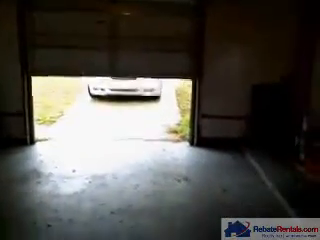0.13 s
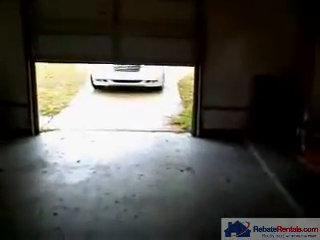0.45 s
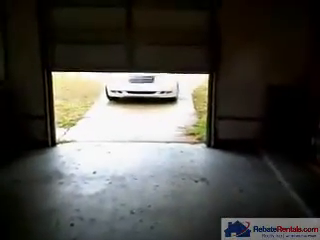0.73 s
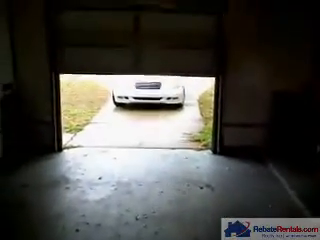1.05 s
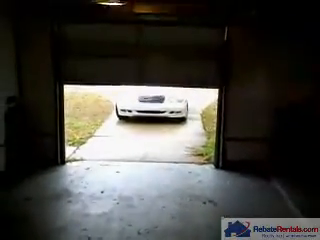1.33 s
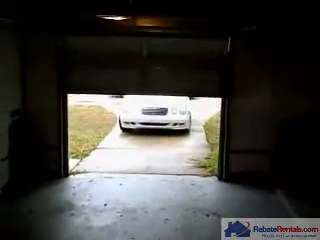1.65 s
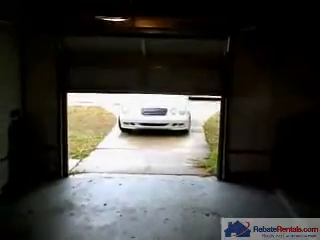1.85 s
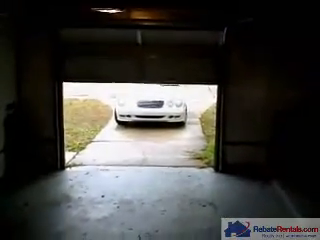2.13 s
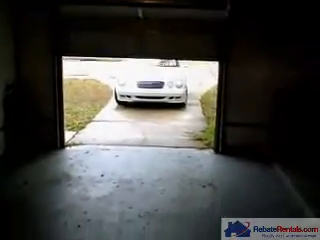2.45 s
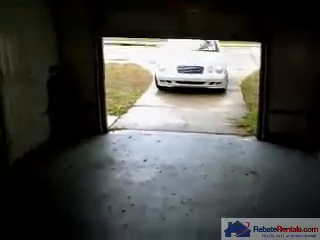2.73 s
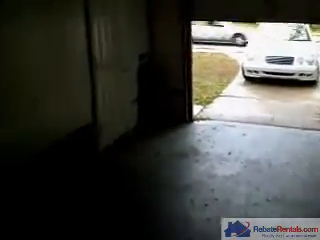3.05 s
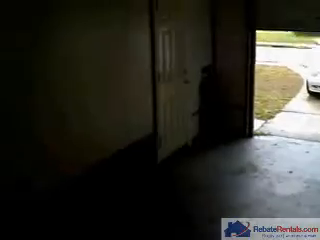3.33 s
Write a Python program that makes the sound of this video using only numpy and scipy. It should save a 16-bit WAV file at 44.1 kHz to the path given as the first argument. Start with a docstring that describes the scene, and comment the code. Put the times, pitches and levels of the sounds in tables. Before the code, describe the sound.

A garage door is already rising at 0 s and continues to the end, about 3.5 s. A low electric hum wavers under gear whirr, bright throbbing chain jingle and gritty roller scrape. Metallic clacks cluster before 0.3 s, scatter from 1.5 to 2 s, and snap sharply near 2.5 s. Panels then drum and rumble deeper. Mono, dull-topped sound, short bare-garage echo.

```python
"""An electric opener lifts a sectional garage door, heard in mono from inside the garage.
Its motor hums in harmonics while gear whirr, as shaped noise, excites resonances of the housing.
Filtered random impacts make the chain jingle and the rollers scrape; the panels sway, drum and rumble.
Hinges clack in noise bursts with a steel resonance, and the bare walls return a brief diffuse echo."""
import sys
import numpy as np
from scipy import signal
from scipy.fft import rfft, irfft, next_fast_len
from scipy.io import wavfile

SR = 44100
rng = np.random.default_rng(int(sys.argv[2]) if len(sys.argv) > 2 else 0)


def store_pcm(level_fs):
    """Save levels as 16-bit WAV."""
    pcm = np.round(np.clip(level_fs, -1, 1) * 32767).astype(np.int16)
    wavfile.write(sys.argv[1], SR, np.atleast_2d(pcm).T)


N = 154350  # 3.5 s
TOP_HZ = 8100  # upper limit of the recorded band


def undb(db):
    """Level definition: amplitude ratio = 10^(dB/20)."""
    return 10 ** (np.asarray(db) / 20)


def unit(x):
    """Normalisation: scale to an rms of 1."""
    return x / np.sqrt(np.mean(x ** 2))


def curve(rows, axis=1):
    """Envelope: interpolate one level column linearly in dB over time, then convert to gain."""
    rows = np.array(rows, float)
    level_db = np.interp(np.arange(N) / SR, rows[:, 0], rows[:, axis])
    return undb(level_db)


def walk(rate_hz):
    """Low-pass noise: a smooth random wander with an rms of 1."""
    f = np.arange(N // 2 + 1) * SR / N
    spectrum = rfft(rng.standard_normal(N)) / (1 + (f / rate_hz) ** 2) ** 2
    return unit(irfft(spectrum, N))


def ring(x, response):
    """Linear superposition: convolve a sound with an impulse response."""
    return signal.fftconvolve(x, response)[:len(x)]


def colour(x, points, size=8192):
    """Minimum-phase filtering: a causal filter through f/Hz, level/dB that keeps white-noise power."""
    hz, db = np.array(points, float).T
    f = np.arange(size // 2 + 1) * SR / size
    gain = undb(np.interp(np.log(f + 1), np.log(hz), db))
    gain = unit(gain / np.sqrt(1 + (f / TOP_HZ) ** 20))
    # Folding the cepstrum onto positive time gives the minimum phase
    cepstrum = irfft(np.log(gain))
    cepstrum[1:size // 2] *= 2
    cepstrum[size // 2 + 1:] = 0
    return ring(x, irfft(np.exp(rfft(cepstrum))))


def resonance(hz, width_hz):
    """Resonance: noise concentrated about one frequency, 6 dB down at width_hz to either side."""
    f = np.arange(N // 2 + 1) * SR / N
    response = 1 / (1 + ((f - hz) / width_hz) ** 2)
    return unit(irfft(rfft(rng.standard_normal(N)) * response, N))


def ticks(rate_per_s, spread_db):
    """Shot noise: random tiny impacts of uneven strength and either sign."""
    hit = rng.random(N) < rate_per_s / SR
    size = np.clip(rng.standard_normal(N), -2, 2)
    sign = np.sign(rng.standard_normal(N))
    return unit(hit * undb(spread_db * size) * sign)


HUM_HZ, HUM_WOBBLE, HUM_FLUTTER_DB = 119.5, 0.0038, 0.5  # twice the mains frequency; rms wobble, flutter
# Hum envelope: t/s, level/dB
HUM_ENVELOPE = [(0, -29), (.36, -27), (.44, -32), (.5, -29), (.6, -23.5), (.645, -34), (.69, -25),
                (.8, -28), (.855, -31), (.92, -25.5), (1.47, -24.5), (1.56, -29.5), (1.62, -24.5),
                (1.77, -31.5), (1.85, -22.5), (1.92, -30.5), (1.97, -24), (2.015, -39), (2.08, -27.5),
                (2.13, -49), (2.19, -25), (2.29, -33), (2.4, -26.5), (2.46, -35), (2.5, -30), (2.9, -28.5),
                (3.0, -37), (3.06, -29), (3.5, -30.5)]
# Harmonics of the hum: multiple, level/dB
HUM_HARMONICS = [(1, -0.5), (2, -16.5), (3, -27), (5, -29)]
# Relative spectrum of the motor and gear whirr: f/Hz, level per Hz/dB
WHIRR_SPECTRUM = [(20, -11), (45, -0.5), (80, -3), (105, 3.5), (135, 4), (160, -6), (190, 1), (230, -6.5),
                  (300, -6.5), (420, -11.5), (520, -10.5), (760, -10), (1050, -18.5), (2000, -19.5),
                  (4000, -23.5), (8000, -32)]
# Whirr envelope: t/s, level/dB
WHIRR_ENVELOPE = [(0, -34.5), (.3, -32), (.5, -35.5), (.9, -35), (1.3, -32), (1.7, -33), (2.15, -32),
                  (2.7, -33.5), (3.1, -35), (3.5, -33)]
# Resonances of the motor housing: f/Hz, width/Hz, level/dB
HOUSING_MODES = [(307, 3.3, -58.5), (498, 24, -56.5), (609, 59, -48), (1370, 140, -55.5)]


def motor():
    """Forced vibration: wavering mains harmonics, gear noise and resonances of the housing."""
    phase = 2 * np.pi * np.cumsum(HUM_HZ * (1 + HUM_WOBBLE * walk(14.4))) / SR
    hum = np.zeros(N)
    for multiple, db in HUM_HARMONICS:
        gain = undb(db + HUM_FLUTTER_DB * walk(15))
        hum += gain * np.sin(round(multiple) * phase + 2 * np.pi * rng.random())
    hum *= np.sqrt(2) * curve(HUM_ENVELOPE)  # root 2 turns peak into rms
    whirr_gain = curve(WHIRR_ENVELOPE)
    whirr = unit(colour(rng.standard_normal(N), WHIRR_SPECTRUM)) * whirr_gain
    housing = sum(undb(db) * resonance(hz, width) for hz, width, db in HOUSING_MODES)
    return hum + whirr + housing * unit(whirr_gain)


LINKS_PER_S, LINK_DEPTH_DB, CHAIN_TICKS_PER_S = 19, 2.4, 1000
RAIL_HZ, RAIL_WIDTH_HZ, RAIL_DB = 6160, 300, -44  # the rail sings under the sliding chain
# Relative spectrum of the chain jingle: f/Hz, level per Hz/dB
CHAIN_SPECTRUM = [(800, -33), (2500, -15.5), (4200, -8), (5000, -1.5), (5500, -1), (6050, 4), (6600, -2),
                  (7500, 0.5), (8200, -24.5)]
# Jingle envelope: t/s, level/dB
CHAIN_ENVELOPE = [(0, -35.5), (.45, -36.5), (.62, -36), (.8, -32), (.92, -38), (1.15, -36.5), (1.42, -40),
                  (1.55, -34), (1.67, -29), (1.9, -36.5), (2.05, -30.5), (2.15, -34.5), (2.33, -28.5),
                  (2.45, -32.5), (2.6, -34), (2.85, -33), (3.08, -40), (3.3, -34), (3.5, -35)]


def chain():
    """Amplitude modulation: links riding over the sprocket throb the bright ticks and the rail's ring."""
    phase = 2 * np.pi * np.cumsum(LINKS_PER_S * (1 + 0.054 * walk(4))) / SR
    throb = undb(LINK_DEPTH_DB * np.sin(phase) + 1.8 * walk(65))
    impacts = ticks(CHAIN_TICKS_PER_S, spread_db=0) * throb
    jingle = unit(colour(impacts, CHAIN_SPECTRUM)) * curve(CHAIN_ENVELOPE)
    rail = undb(RAIL_DB) * resonance(RAIL_HZ, RAIL_WIDTH_HZ) * throb
    return jingle + rail


SCRAPES_PER_S = 2500
# Relative spectrum of the rollers in their steel tracks: f/Hz, level per Hz/dB
ROLLER_SPECTRUM = [(150, 5), (400, 3.5), (700, 2), (1050, 0.5), (1700, 2.5), (2500, -0.5), (3300, 0.5),
                   (4500, -1.5), (6500, -1.5), (8200, -20)]
# Scrape envelope: t/s, level/dB
ROLLER_ENVELOPE = [(0, -36), (.055, -57), (.08, -33), (.28, -35), (.42, -42), (.58, -36.5), (.7, -38.5),
                   (1.05, -40), (1.43, -45), (1.48, -37), (1.58, -35), (1.67, -29), (1.73, -39),
                   (1.79, -31), (1.86, -40.5), (1.92, -37), (1.96, -32.5), (2.2, -33.5), (2.43, -35),
                   (2.7, -35), (2.98, -35), (3.15, -39), (3.23, -34.5), (3.32, -36), (3.4, -38), (3.5, -36)]


def rollers():
    """Friction as shot noise: gritty impacts that come and go as the rollers bear on the track."""
    scrape = unit(colour(ticks(SCRAPES_PER_S, spread_db=5.5), ROLLER_SPECTRUM))
    return scrape * curve(ROLLER_ENVELOPE)


SWAY_HZ, DRUM_HZ = 33.7, 58.6  # the two low modes of the door
RUMBLE_DB = -5  # relative to the combined gain of the two modes
# Envelopes of the two modes: t/s, sway level/dB, drumming level/dB
MODE_ENVELOPES = [(0, -45, -42), (.1, -40, -44), (.42, -34, -42), (.6, -45, -47), (.8, -35, -59),
                  (1.46, -45.5, -46), (1.5, -39, -35), (1.77, -52, -30), (1.82, -48, -51), (2.45, -34, -34),
                  (2.475, -35, -28), (2.78, -35, -22.5), (2.84, -28, -32.5), (2.9, -31.5, -28),
                  (3.08, -28, -31), (3.18, -27, -37), (3.42, -29, -45), (3.5, -27, -44)]
# Relative spectrum of the panel rumble: f/Hz, level per Hz/dB
RUMBLE_SPECTRUM = [(20, -11.5), (45, 0.5), (70, -8.5), (100, 1), (135, 0), (175, -1.5), (215, -12),
                   (290, -9), (400, -22.5), (900, -41.5)]


def panels():
    """Modal vibration: the door sways and drums in two wavering modes, and its rumble follows them."""
    def mode(hz, wobble, flutter_db):
        """Frequency and amplitude modulation: a low tone that wanders in pitch and level."""
        phase = 2 * np.pi * np.cumsum(hz * (1 + wobble * walk(9.2))) / SR
        return np.sqrt(2) * np.sin(phase) * undb(flutter_db * walk(15))

    sway_gain = curve(MODE_ENVELOPES, axis=1)
    drum_gain = curve(MODE_ENVELOPES, axis=2)
    sway = sway_gain * mode(SWAY_HZ, wobble=0.055, flutter_db=1.5)
    drum = drum_gain * mode(DRUM_HZ, wobble=0.019, flutter_db=2.0)
    noise = unit(colour(rng.standard_normal(N), RUMBLE_SPECTRUM))
    rumble = undb(RUMBLE_DB) * noise * np.hypot(sway_gain, drum_gain)
    return sway + drum + rumble


CONTACT_S, RING_S = 0.0012, .02  # time for the power of a contact and of the ring to fall to 1/e
CLACK_DB, RING_DB = 5.5, -17  # gain of the whole clack; ring relative to its contacts
PEAK_WIDTH_HZ, PEAK_DB = 280, -4.5  # the one resonance of a hinge that stands out
# Clacks of hinges and rollers, levels before CLACK_DB; a longer attack is a sliding contact:
# t/s, panel knock level/dB, steel ring level/dB, steel resonance f/Hz, attack/s
CLACK_EVENTS = [(.067, -26.5, -40, 6000, .008), (.094, -32, -24.5, 6100, 0.01),
                (.161, -31, -20.5, 6900, .008), (.183, -32, -27.5, 5600, .004),
                (0.2326, -27, -17.5, 5210, .001), (.247, -24.5, -31, 5330, .002),
                (.4998, -35.5, -38, 6000, 0.0035), (.5644, -35, -42, 6000, .006),
                (1.457, -32, -36, 6000, 0.0051), (1.5336, -30.5, -28.5, 6100, .006),
                (1.5981, -31, -27, 6200, .008), (1.7579, -31.5, -25.5, 6100, .006),
                (1.9368, -29, -33, 6000, 0.0042), (1.9784, -34, -23, 6000, .005),
                (2.183, -43, -30, 6100, .005), (2.4623, -25.5, -17.5, 6150, .0005),
                (2.477, -28, -24, 6200, .001), (2.6229, -25, -24.5, 6200, 0.006),
                (2.909, -30.5, -26, 6200, 0.0054), (3.1984, -35.5, -44, 6000, .008),
                (3.3435, -40, -41.5, 6000, .006), (3.3713, -28.5, -33, 6200, 0.0058)]
# Chatter after each clack: delay/s, level/dB
CHATTER = [(.003, 1.5), (.007, -3), (0.017, -4), (0.021, -7.5)]
# Relative spectrum of the panel knock: f/Hz, level per Hz/dB
KNOCK_SPECTRUM = [(60, 10), (200, 2), (350, 2), (650, 2), (1100, -0.5), (2000, 1), (3200, 5), (4500, 0.5),
                  (8000, -16)]
# Relative spectrum of the hinge steel: f/Hz, level per Hz/dB
STEEL_SPECTRUM = [(1500, -19.5), (3000, -11.5), (4100, -8), (4700, -0.5), (5600, 1.5), (6500, 3),
                  (7300, -1), (8200, -22)]


def hinges():
    """Impact excitation: each clack chatters, knocks the panel and rings the steel at its own pitch."""
    t = np.arange(N // 8) / SR
    power = undb(RING_DB) ** 2 * np.exp(-t / RING_S)
    for lag, db in [(0.0011, 0.02)] + CHATTER:  # the first contact leads the chatter
        power += undb(db) ** 2 * (t >= lag) * np.exp(-np.abs(t - lag) / CONTACT_S)
    shape = undb(CLACK_DB) * np.sqrt(power)
    out = np.zeros(N + len(t))
    for start, knock_db, steel_db, hz, attack in CLACK_EVENTS:
        envelope = shape * np.sqrt(np.minimum(t / attack, 1))
        knock, steel, push = envelope * rng.standard_normal((3, len(t)))
        mode = np.sin(2 * np.pi * hz * t) * np.exp(-np.pi * PEAK_WIDTH_HZ * t)
        mode /= np.linalg.norm(mode)
        steel = colour(steel, STEEL_SPECTRUM) + undb(PEAK_DB) * ring(push, mode)
        clack = undb(knock_db) * colour(knock, KNOCK_SPECTRUM) + undb(steel_db) * steel
        i = int(start * SR)
        out[i:i + len(t)] += clack
    return out[:N]


ROOM_T60_S, ROOM_TREBLE_T60_S = 0.53, 0.31  # 60 dB decay times at 0 Hz and at TOP_HZ
ROOM_DB, FIRST_ECHO_S, ROOM_BAND_HZ = 2.5, 0.0026, 500  # echo level re direct, delay, band spacing


def garage(x):
    """Diffuse reverberation: each band stores energy that dies away exponentially, the treble fastest."""
    size = next_fast_len(N + SR // 2, real=True)
    f = np.arange(size // 2 + 1) * SR / size
    age = np.arange(SR // 2) / SR
    source = rfft(x, size)
    diffuse = rfft(rng.standard_normal(size))
    wet = np.zeros(N)
    for hz in np.arange(0, TOP_HZ + ROOM_BAND_HZ, ROOM_BAND_HZ):
        band = np.sqrt(np.maximum(1 - np.abs(f - hz) / ROOM_BAND_HZ, 0))
        t60 = np.interp(hz, [0, TOP_HZ], [ROOM_T60_S, ROOM_TREBLE_T60_S])
        decay = undb(-60 * age / t60) ** 2 * (age > FIRST_ECHO_S)
        source_power = irfft(source * band, size)[:N] ** 2
        energy = ring(source_power, decay / decay.sum())
        noise = irfft(diffuse * band ** 2, size)[:N]
        # The factor offsets the share of noise power that falls in one band
        wet += np.sqrt(np.abs(energy) * SR / 2 / ROOM_BAND_HZ) * noise
    return (x + undb(ROOM_DB) * wet) / np.hypot(1, undb(ROOM_DB))


def scene():
    """Superposition: drone and shudder are direct, the metal noises echo; both channels are alike."""
    metal = chain() + rollers() + hinges()
    mono = motor() + panels() + garage(metal)
    return np.array([mono, mono])


def record(dry):
    """Band limiting: a steep elliptic low-pass cuts off the top."""
    low_pass = signal.ellip(10, .2, 80, TOP_HZ, fs=SR, output="sos")
    return signal.sosfilt(low_pass, dry)


dry = scene()
out = record(dry)
store_pcm(out)
```